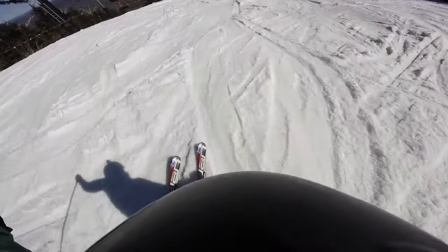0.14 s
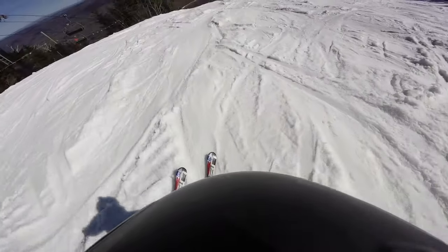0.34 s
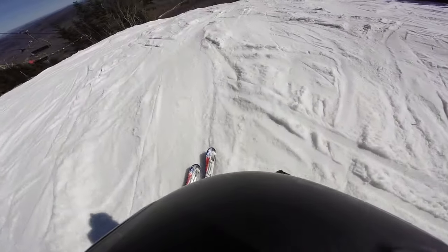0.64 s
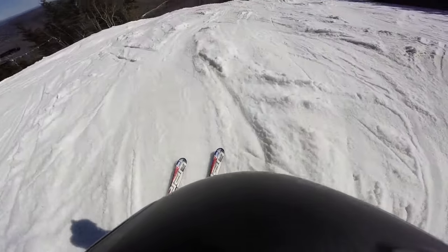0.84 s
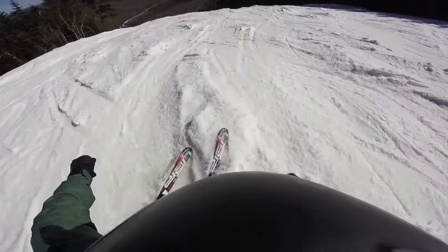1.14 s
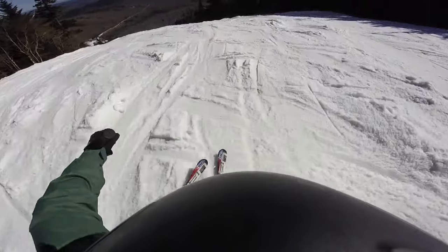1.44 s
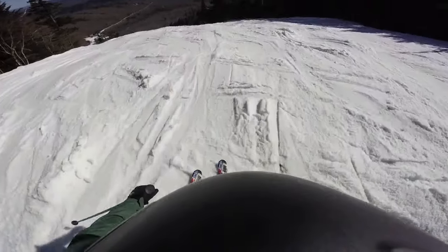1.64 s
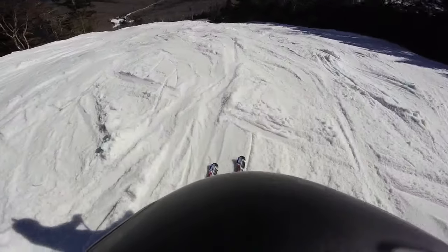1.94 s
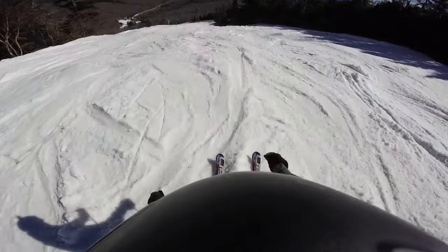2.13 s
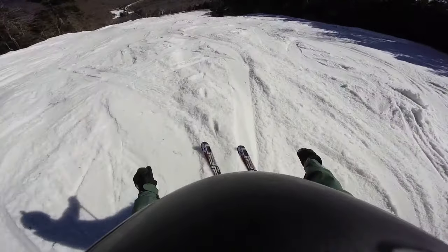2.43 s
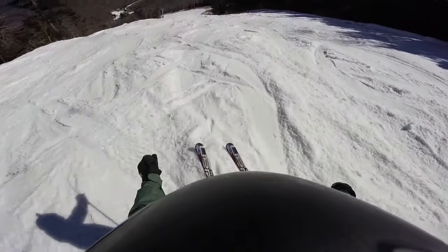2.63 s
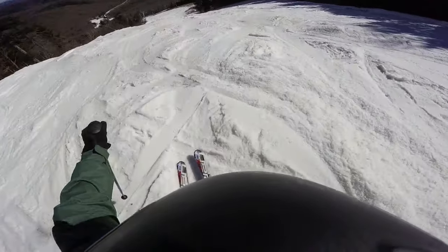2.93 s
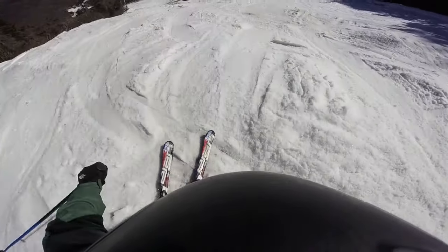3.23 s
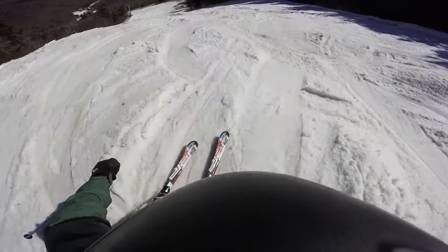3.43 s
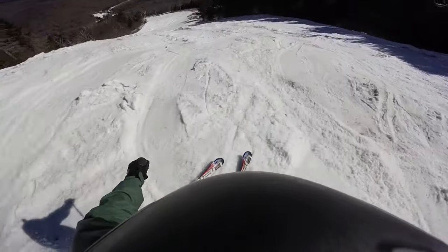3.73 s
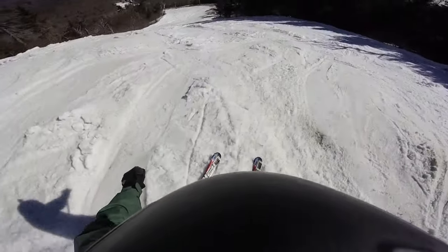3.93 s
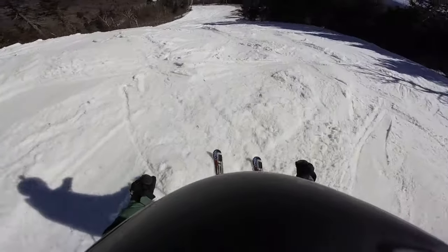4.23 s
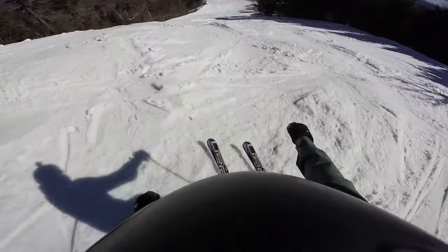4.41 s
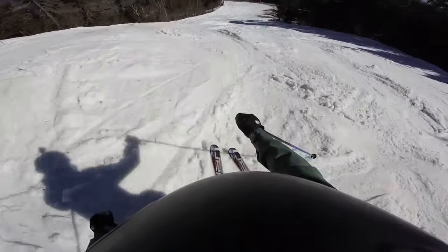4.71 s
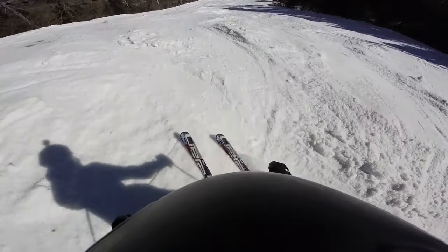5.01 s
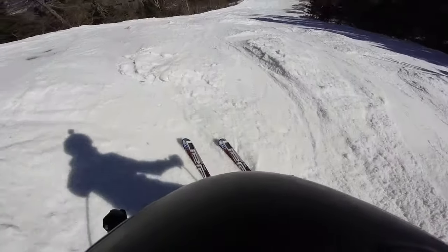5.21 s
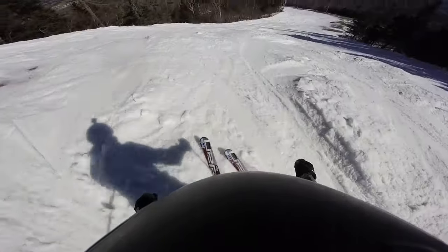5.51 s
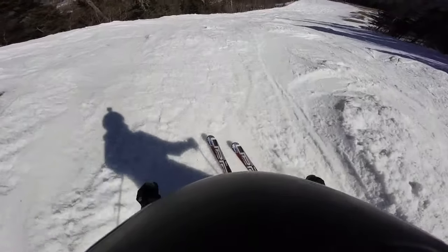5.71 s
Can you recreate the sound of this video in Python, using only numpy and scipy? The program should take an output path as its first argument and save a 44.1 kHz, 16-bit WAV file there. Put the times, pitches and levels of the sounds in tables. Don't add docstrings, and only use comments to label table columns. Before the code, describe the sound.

From a skier's helmet camera shut in a case, edges grind firm snow with a coarse mid-range hiss. The scrape is strong at first, lighter from about two seconds, then bites again near the end. Low wind buffets and dull mount thumps run beneath, with a few tiny crust snaps.

```python
import sys
import numpy as np
from scipy import signal
from scipy.fft import rfft, irfft, next_fast_len
from scipy.io import wavfile
from scipy.ndimage import uniform_filter1d

SR = 44100
rng = np.random.default_rng(int(sys.argv[2]) if len(sys.argv) > 2 else 0)


def level_to_linear(level):
    exponent = np.asarray(level, float) / 20
    return 10 ** exponent


def store_pcm(level_fs):
    pcm = np.round(np.clip(level_fs, -1, 1) * 32767).astype(np.int16)
    wavfile.write(sys.argv[1], SR, np.atleast_2d(pcm).T)


N = 258426
T = np.arange(N) / SR
LONG = next_fast_len(N + SR // 10)
HZ = np.maximum(np.fft.rfftfreq(LONG, 1 / SR), 1e-3)


def unit(x):
    return x / np.sqrt(np.mean(x ** 2))


def curves(table):
    start_s, *columns = np.transpose(table)
    return [np.interp(T, start_s, column) for column in columns]


def swells(rows):
    return sum(height * np.exp(-(2 * (T - s) / length_s) ** 2) for s, length_s, height in rows)


def shape_db(points):
    hz, db = np.transpose(points)
    return np.interp(np.log(HZ), np.log(hz), db)


def walk(rate_hz):
    knots = np.repeat(rng.standard_normal(int(N / SR * rate_hz) + 2), 8)
    knots = uniform_filter1d(knots, 8)
    knots = knots - uniform_filter1d(knots, 28)
    return unit(np.interp(T * rate_hz * 8, np.arange(len(knots)), knots))


def even(x, hold_s):
    hold = int(hold_s * SR)
    power = uniform_filter1d(uniform_filter1d(x ** 2, hold), hold)
    return x / np.sqrt(power)


def ring(x, hz, t60_s):
    pole = np.exp(2j * np.pi * hz / SR - np.log(1000) / (t60_s * SR))
    return signal.lfilter([1], [1, -pole], x).imag


def strikes(rows, voice, size=8192):
    out = np.zeros(N + size)
    tick = np.eye(1, size)[0]
    for start_s, peak_db, *rest in rows:
        hit = voice(tick, *rest)
        i = int(start_s * SR)
        out[i:i + size] += level_to_linear(peak_db) * hit / np.abs(hit).max()
    return out[:N]


# start_s, load_db, spray_over_load_db
EDGE_LOAD = [(0, -34.0, -27.5), (.38, -37.5, -18), (.6, -33.5, -23), (.85, -35.0, -22.0), (1.03, -34, -21),
             (1.3, -35.5, -17.5), (1.47, -37, -19), (1.83, -42.5, -23.5), (2.4, -41, -27.5),
             (2.56, -40, -21.0), (2.99, -42, -25), (3.2, -39.5, -20), (3.45, -41.0, -16),
             (4.1, -39.5, -23.5), (4.78, -39.5, -20), (5.2, -36.5, -22.5), (5.58, -39.5, -19),
             (5.86, -38.0, -21.5)]
# centre_s, length_s, extra_pressure_db
EDGE_DIGS = [(.05, 0.12, 1), (.6, 0.082, 3), (.8, 0.24, 0.5), (1.28, 0.12, 8), (1.42, 0.18, 8),
             (2.66, 0.18, 2), (3.08, 0.17, 2.5), (3.38, 0.14, 4), (3.65, .06, 1), (4.15, .15, 2),
             (4.47, 0.36, 5), (5.28, 0.038, -1), (5.59, .06, -4.5)]
# centre_s, length_s, height_db
SNOW_PUFFS = [(.5, .1, 0), (.62, 0.065, -2), (.9, .06, -2), (1.23, .1, 0.5), (1.4, .05, -0.5),
              (2.0, 0.11, 4), (2.64, 0.095, 3), (3.06, 0.11, 2.5), (3.18, .08, 1.5), (3.31, 0.047, -8),
              (4.32, .06, -2), (4.47, 0.13, 4), (4.63, .08, -2.5), (5.05, 0.11, 4), (5.19, 0.087, -3.5),
              (5.35, 0.32, 3), (5.74, 0.18, 2.5)]
# centre_s, length_s, extra_grit_db
SNOW_PATCHES = [
    (.1, 0.8, 2),
    (1.8, 0.3, -1),
    (2.3, 0.31, 5.5),
    (3.45, 0.36, -4),
    (4.1, 0.41, 0.5),
]


def carving():
    load_db, spray_db = curves(EDGE_LOAD)
    puff_db = swells(SNOW_PUFFS)
    pressure_db = 1.04 * load_db + swells(EDGE_DIGS)
    body_db = load_db + 0.45 * puff_db
    grit_db = load_db + 0.85 * spray_db + 0.9 * puff_db + swells(SNOW_PATCHES)
    treble_db = load_db + spray_db + puff_db
    seams_db = curves(AIR_FLOW)[0] + 0.7 * puff_db
    return np.array([pressure_db, body_db, grit_db, treble_db, seams_db])


# pitch_hz, density_db_per_hz
CASE_SPECTRUM = [(350, -24), (600, -21.5), (949, -14), (1350, 1), (1760, -4.5), (2610, -2), (2870, -10.5),
                 (3910, -15), (4720, -25), (5400, -27.5), (5930, -20), (6880, -27.5), (8770, -26),
                 (9770, -34.5), (15000, -52)]
# pitch_hz, width_hz, gain_db
CASE_RESONANCES = [(1540, 240, 4), (1980, 206, 3.5), (2700, 76, 4), (2720, 150, -2.5), (3060, 103, 5.5),
                   (3410, 92, 5.5), (4050, 630, 3.5), (5030, 170, 5), (5500, 290, 0), (5900, 360, 4.5),
                   (6400, 210, 0.5), (7930, 210, -3.5), (8700, 970, -0.5), (9700, 410, -4),
                   (10460, 500, 2.5), (12300, 700, 1), (14000, 3800, 7)]


def case_gain():
    modes_db = sum(db / (1 + (2 * (HZ - hz) / width_hz) ** 2) for hz, width_hz, db in CASE_RESONANCES)
    return level_to_linear(shape_db(CASE_SPECTRUM) + modes_db)


def scrape():
    grains = rng.standard_normal(N) * level_to_linear(1.5 * np.minimum(rng.exponential(size=N), 8.5))
    smear_s = 0.0019
    tail = rfft(rng.standard_normal(1024) * np.exp(-T[:1024] / smear_s), LONG)
    heard = rfft(grains, LONG) * tail / np.abs(tail) * case_gain()
    heard /= np.std(irfft(heard * (HZ > 1400) * (HZ < 2800), LONG))
    controls = carving()
    controls += controls[1].mean() - controls.mean(axis=1, keepdims=True)
    place_hz = [800, 1100, 1320, 1520, 2600, 3600, 6500, 8000, 10000, 12500]
    place_control = [.6, 0, 0, 1, 1, 2, 2, 3, 3, 4]
    chatter = walk(40)
    near = walk(30)
    out = 0
    for k in range(27):
        hz = 500 * 2 ** (k / 5)
        band = np.clip(1 - 5 * np.abs(np.log2(HZ / hz)), 0, 1)
        place = np.interp(np.log(hz), np.log(place_hz), place_control)
        share = np.clip(1 - np.abs(place - np.arange(5)), 0, 1)
        near = 0.9 * near + 0.44 * walk(30)
        flutter_db = 0.49 * near + 0.78 * walk(22) + 0.5 * walk(50)
        out = out + irfft(heard * band, LONG)[:N] * level_to_linear(share @ controls + flutter_db)
    return out * level_to_linear(0.39 * chatter)


# start_s, peak_db, pitch_hz
MOUNT_JOLTS = [(0.023, -19.5, 94.5), (0.096, -36, 111), (0.194, -17, 110), (0.234, -22.5, 111),
               (0.357, -33.5, 116), (1.016, -27.5, 111), (1.226, -27, 106), (1.416, -28.5, 91),
               (1.582, -25.5, 110), (2.012, -35, 129), (2.167, -29, 109), (2.235, -16.5, 111),
               (2.62, -20.5, 118.5), (2.85, -33.5, 129), (3.031, -16, 111), (3.08, -20, 101.4),
               (3.166, -28.5, 114), (3.252, -22, 103), (3.649, -16.5, 108), (4.091, -20, 109),
               (4.261, -27.5, 90), (4.469, -18, 111), (4.796, -33, 105), (4.845, -30, 106),
               (5.288, -14, 107), (5.38, -28.5, 110), (5.53, -13, 99.4), (5.55, -26.5, 121),
               (5.611, -25.5, 107), (5.834, -16.5, 110)]


def jolts():
    ring_cycles, sudden = 4.45, 0.35

    def voice(tick, hz):
        helmet = ring(tick, 1.19 * hz, 0.02)
        padding = ring(helmet, hz, 0.034)
        swing = ring(padding, hz, ring_cycles / hz)
        speed = np.diff(swing, prepend=0) * SR / (2 * np.pi * hz)
        return sudden * swing + (1 - sudden) * speed
    return strikes(MOUNT_JOLTS, voice)


# start_s, peak_db, pitch_hz, ring_t60_s, thud_share_0_1
CRUST_SNAPS = [(.0278, -24, 1580, 0.0098, 0.1), (.039, -34, 2000, .007, 0),
               (2.6297, -18, 1970, 0.0034, 0.25), (2.6255, -24, 2580, 0.0065, 0),
               (2.637, -24.5, 2250, 0.0089, 0.1), (3.3912, -33, 1400, 0.0087, 0.26),
               (4.158, -22.5, 1440, .007, 0.18), (4.2971, -39, 1530, .008, 0.1),
               (4.4977, -24, 1550, .016, 0.27), (5.2886, -26, 1580, 0.012, 0),
               (5.529, -29, 1270, 0.017, .4)]


def snaps():
    thud_hz, shell_hz = 230, 700

    def voice(tick, hz, t60_s, thud):
        crack = np.diff(ring(ring(tick, 1.08 * hz, t60_s), 0.86 * hz, t60_s), prepend=0)
        boot = ring(ring(tick, thud_hz, 0.038), 1.04 * thud_hz, 0.015)
        shell = ring(ring(tick, shell_hz, 0.0064), 1.5 * shell_hz, 0.01)
        body = boot / boot.max() + 0.82 * shell / shell.max()
        return crack / crack.max() + thud * body
    return level_to_linear(1.0) * strikes(CRUST_SNAPS, voice)


# start_s, seam_hiss_db, eddies_db
AIR_FLOW = [(0, -74, -43.5), (.48, -70.0, -45.5), (.65, -74, -43.5), (1.13, -74.0, -47), (1.28, -70.0, -48),
            (1.6, -78.0, -48.5), (1.9, -76, -51.5), (2.32, -79, -52), (2.6, -73.0, -49.5),
            (2.9, -79.0, -49.5), (3.15, -74.0, -49), (3.6, -75.5, -49.5), (3.95, -77.5, -50.5),
            (4.25, -71, -50), (4.5, -70, -49), (5.0, -72, -48), (5.4, -71, -48.5), (5.86, -71.0, -51)]
# centre_s, length_s, peak_db
WIND_GUSTS = [(0.194, 0.23, -22), (0.366, 0.29, -28), (0.804, 0.76, -32), (1.02, 0.043, -32),
              (1.204, 0.16, -29.5), (1.416, .13, -24), (1.576, 0.038, -39), (1.796, 0.16, -35.5),
              (2.05, 0.077, -30.5), (2.41, 0.15, -36.5), (2.637, 0.11, -35), (2.78, .08, -29),
              (2.906, 0.12, -37.5), (3.124, 0.033, -25.5), (3.226, 0.061, -21.5), (3.352, 0.063, -33),
              (3.49, 0.095, -27), (3.92, 0.6, -33), (4.483, 0.14, -25.5), (4.627, 0.15, -25.5),
              (4.786, 0.14, -32), (4.982, .12, -26), (5.17, 0.17, -28.5), (5.427, 0.2, -21),
              (5.598, 0.06, -22), (5.783, 0.24, -32.5)]


def airflow():
    calm_db, shake_db = -42, -41
    stir_db, stir_s = 11, 0.044
    load_db = curves(EDGE_LOAD)[0]
    shake_db = shake_db + 0.7 * (load_db - load_db.mean())
    gusts = level_to_linear(calm_db) + swells([(s, length_s, level_to_linear(db)) for s, length_s, db in WIND_GUSTS])
    blows = swells([(s + stir_s / 2, stir_s, level_to_linear(db)) for s, db, _ in MOUNT_JOLTS])
    eddies = level_to_linear(curves(AIR_FLOW)[1]) * (1 + level_to_linear(stir_db) * blows)
    return gusts, shake_db, eddies


# pitch_hz, density_db_per_hz
BUFFET_SPECTRUM = [(3, -5), (8, 4), (16, 0), (26, -12), (40, -17), (60, -22.5), (120, -28.5), (200, -64),
                   (5000, -120)]
# pitch_hz, density_db_per_hz
RUSH_SPECTRUM = [(100, -10), (170, -2), (300, -4.5), (400, -9.5), (700, -17), (1000, -29), (1500, -34),
                 (6000, -78)]


def wind():
    def shaped_noise(spectrum):
        noise = rfft(rng.standard_normal(LONG))
        return unit(irfft(noise * level_to_linear(shape_db(spectrum)), LONG)[:N])

    gusts, shake_db, eddies = airflow()
    buffet = even(shaped_noise(BUFFET_SPECTRUM), 0.082) * gusts * level_to_linear(-1.5)
    rush = shaped_noise(RUSH_SPECTRUM) * eddies * level_to_linear(1.0 * walk(14))
    pushes = rng.standard_normal(N) * level_to_linear(3.0 * walk(25))
    shake_hz, shake_t60_s = 110, 0.059
    shake = ring(pushes, shake_hz, shake_t60_s)
    shake = ring(shake, 1.166 * shake_hz, 0.49 * shake_t60_s)
    shake = even(shake, 0.13) * level_to_linear(shake_db + 1.0 * walk(17))
    return buffet + shake + rush


def scene():
    return (scrape() + jolts() + snaps() + wind())[None]


def band_limit(x):
    return signal.sosfilt(signal.butter(12, 15190, fs=SR, output="sos"), x)


def record(dry):
    return band_limit(dry)


dry = scene()
out = record(dry)
store_pcm(out)
```